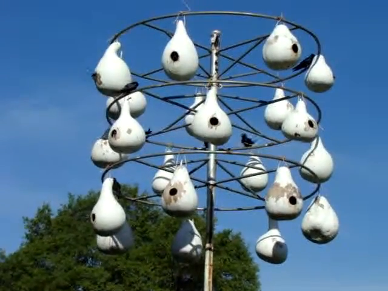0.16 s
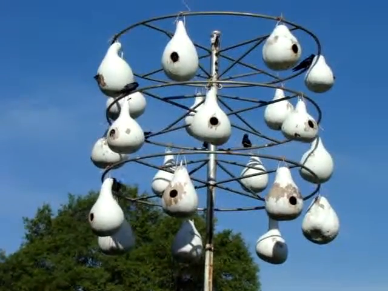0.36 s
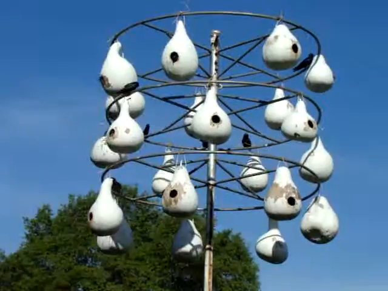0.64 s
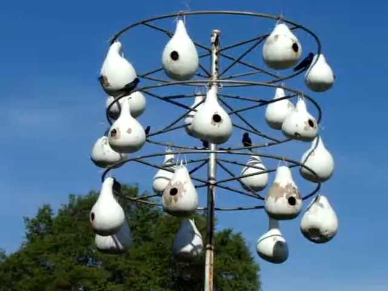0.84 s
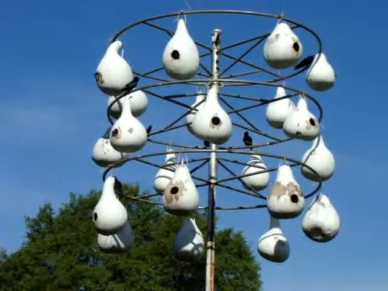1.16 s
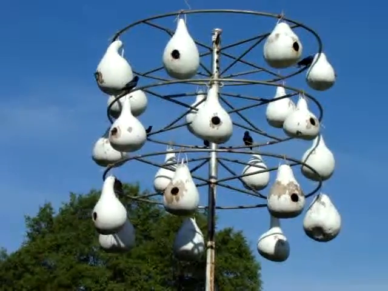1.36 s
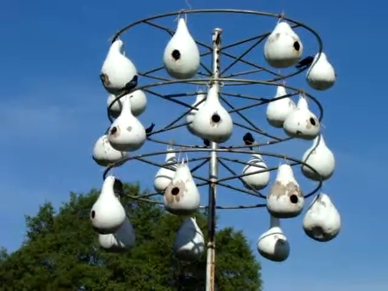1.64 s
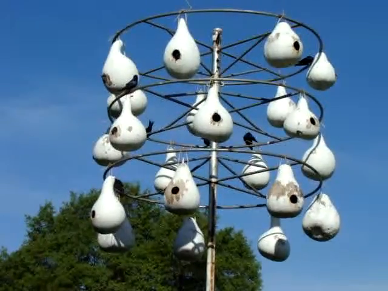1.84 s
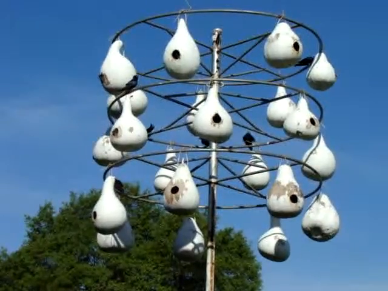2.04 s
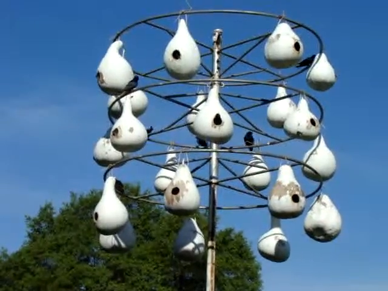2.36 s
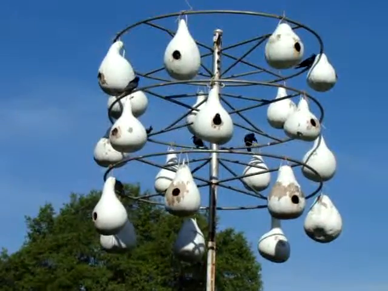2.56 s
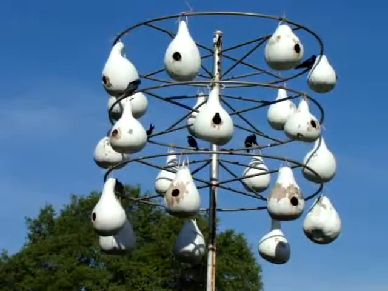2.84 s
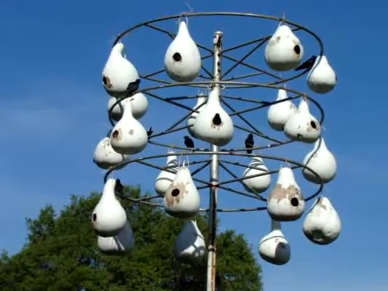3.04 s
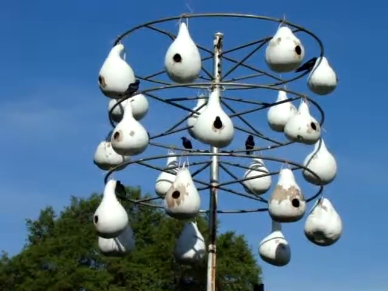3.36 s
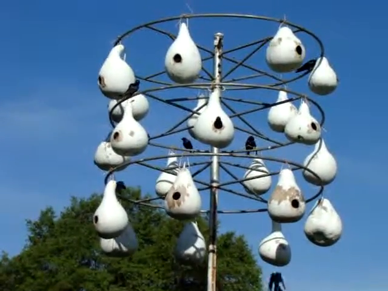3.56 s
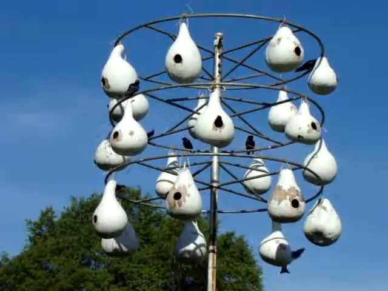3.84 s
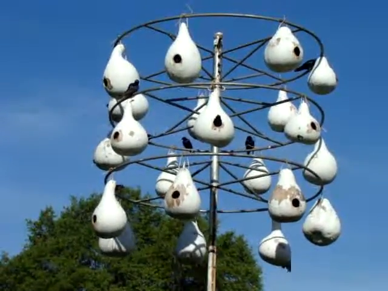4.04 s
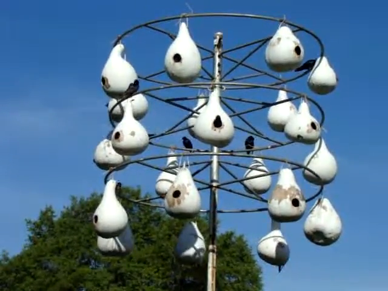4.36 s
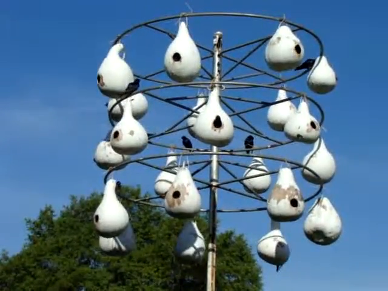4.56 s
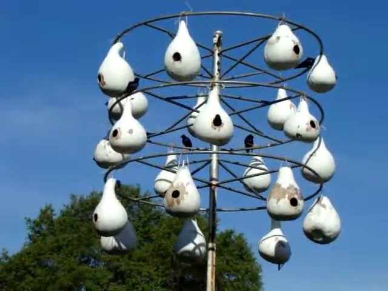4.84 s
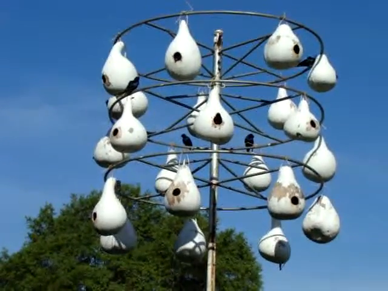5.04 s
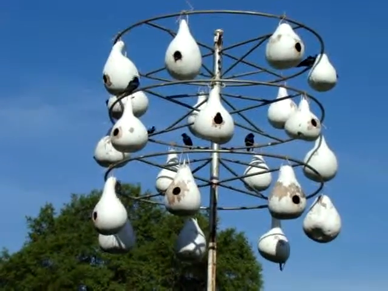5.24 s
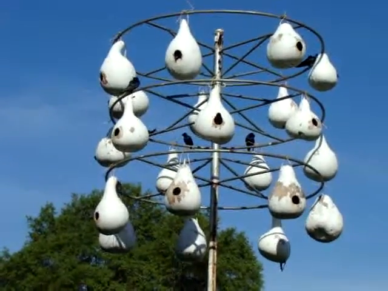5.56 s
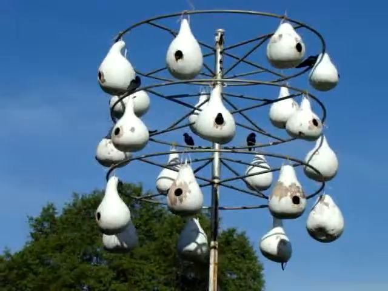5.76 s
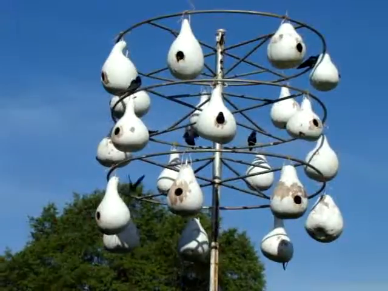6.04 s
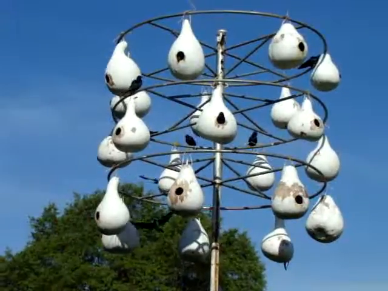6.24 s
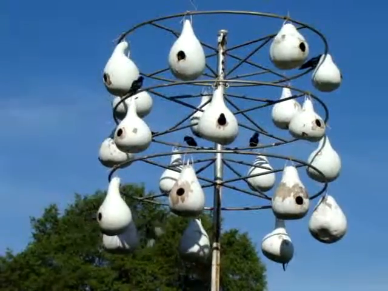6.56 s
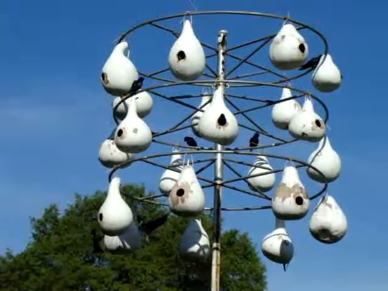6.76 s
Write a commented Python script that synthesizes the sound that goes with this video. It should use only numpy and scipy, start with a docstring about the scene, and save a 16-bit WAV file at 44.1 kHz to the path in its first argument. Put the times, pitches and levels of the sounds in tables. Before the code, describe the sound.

A colony of birds calls close to the microphone at an outdoor rack of hanging gourd nests. Quick falling chirps and harsh notes overlap with clucks, gliding whistles and high cheeps. A few faint bill snaps come in the first half, and short dry rattles join in the second. More birds call faintly further off, over a soft hush of open air and small bumps of breeze on the microphone.

```python
"""A colony of purple martins calls near the microphone, at a rack of hanging gourds on a calm, sunny day.
Each call is a gliding tone of the syrinx, roughened by flutter and shaped by throat and beak:
harsh chews, chirps, clucks, whistles, cheeps and dry rattles, with bill snaps and more birds further off.
Gourds, rack, ground and trees echo and scatter the calls.
Under them lies a soft outdoor hush; small puffs of breeze bump the microphone."""
import sys
import numpy as np
from scipy import signal
from scipy.fft import rfft, irfft, next_fast_len
from scipy.io import wavfile

SR = 44100
rng = np.random.default_rng(int(sys.argv[2]) if len(sys.argv) > 2 else 0)


def unload_wav(signal):
    """Save mono or channel-first audio to the path in sys.argv[1] as 16-bit WAV at rate SR, clipped to [-1, 1]."""
    wavfile.write(
        sys.argv[1],
        SR,
        np.round(np.clip(np.atleast_2d(signal).T, -1, 1) * 32767).astype(np.int16),
    )


N = 304290
TIME = np.arange(N) / SR


def undb(db):
    """Decibels to gain."""
    return 10 ** (np.asarray(db) / 20)


def colour(hz, points):
    """Gain of a spectrum of (f/Hz, level/dB) points at the given frequencies."""
    at, db = np.transpose(points)
    return undb(np.interp(np.log(hz + 1), np.log(at), db))


def unit(x):
    """Scale to rms 1."""
    return x / np.sqrt(np.mean(np.abs(x) ** 2))


def noise(size, low_hz, high_hz):
    """Noise between two soft edges, rms 1."""
    padded = next_fast_len(5120 * (size // 5120 + 1))
    hz = np.fft.rfftfreq(padded, 1 / SR) + 1
    detune = (hz ** 2 - low_hz * high_hz) / (hz * (high_hz - low_hz))
    spectrum = rng.standard_normal(2 * len(hz)).view(complex) / np.sqrt(1 + detune ** 4)
    return unit(irfft(spectrum, padded)[:size])


def walk(rate_hz):
    """Random wandering, spread near 1."""
    knots = rng.standard_normal(int(N / SR * rate_hz) + 2)
    return np.interp(TIME * rate_hz, np.arange(len(knots)), knots)


def add(track, s, sound):
    """Mix a sound into the track at time s."""
    start = int(np.clip(s * SR, 0, N))
    track[start:start + len(sound)] += sound[:N - start]


def slur(hz, octaves, bow):
    """Start, middle and end pitch of a fall from hz; bow (octaves) arches or sags its middle."""
    return hz * 2 ** np.array([0, bow - octaves / 2, -octaves])


def syrinx(length, pitches, db, swell, swell_width, overtones_db, rasp, harsh=.48, flare=0):
    """One note gliding through three pitches, roughened by a flutter as deep as its rasp."""
    # how throat and beak pass the overtones: f/Hz, level/dB
    beak = [(4000, -4), (5000, -15.5), (6500, -21.5), (9000, -21)]
    throat_hz, throat_width_hz = 3100, 130
    size = int(length * SR)
    progress = np.arange(size) / size
    glide = np.exp(np.polyval(np.polyfit([0, .5, 1], np.log(pitches), 2), progress))
    hz = glide * (1 + .12 * harsh ** 2 * noise(size, 30, 110))  # a harsh voice is unsteady
    phase = 2 * np.pi * np.cumsum(hz) / SR
    # the note flares as it sweeps through the throat resonance
    tone = np.exp(1j * phase) * flare / (1 + ((hz - throat_hz) / throat_width_hz) ** 2)
    for k in range(1, 5):
        gain = 1 if k == 1 else (k * hz < SR / 2) * undb(overtones_db + 3 * (4 - k)) * colour(k * hz, beak)
        # a harsh voice breaks into bursts; uneven cycles blur the higher overtones most
        bursts = np.maximum(1 + harsh * noise(size, 40, 170), 0) / np.hypot(1, harsh)
        blur = harsh * (k - .6) * noise(size, 80, 600)
        tone += gain * bursts * np.exp(1j * (k * phase + blur))
    flutter = unit(noise(size, 60, 600) + 1j * noise(size, 60, 600))
    voice = np.imag(tone * (1 + rasp * flutter)) / np.hypot(1, rasp)
    # swell places the push of breath along the note, 0-1
    pressure = np.sin(np.pi * progress ** .85) ** .5 / np.hypot(1, (progress - swell) / swell_width)
    return undb(db) * pressure * voice


def perch_echoes(sound, count=6, first_s=.004, spread_s=.04, echo_db=-11, fade_db=-12):
    """A call with its perch's own few echoes off the gourds, which beat with the sweep and break it up."""
    out = np.pad(sound, (0, SR // 10))
    for lag in (np.arange(count) + rng.random(count)) / count:
        add(out, first_s + spread_s * lag, sound * undb(echo_db + fade_db * lag))
    return out


def air(level_db=-46.5, drift_db=2.44):
    """Soft hush of the open air, drifting a little in level."""
    # spectrum of the hush: f/Hz, relative level/dB
    spectrum = [(20, -26), (80, 5), (190, -9), (580, -3), (1000, -6), (2200, -5), (4300, -12.5),
                (10000, -23.5)]
    hush = irfft(rfft(rng.standard_normal(N)) * colour(np.fft.rfftfreq(N, 1 / SR), spectrum), N)
    return unit(hush) * undb(level_db + drift_db * walk(1.6))


def wind(rumble_db=-2, gust_db=4, puff_db=-1):
    """Eddies right at the microphone: a weak uneven rumble and short bumps."""
    # breeze between the puffs: t/s, level/dB re rumble_db
    breeze = [(0, -48), (.7, -53.5), (.85, -44), (1.35, -52), (1.6, -63), (1.9, -46), (2.8, -52),
              (3.45, -55), (3.6, -46), (3.95, -45), (4.15, -58), (6.9, -57.5)]
    # puffs of air: t/s, length/s, level/dB re puff_db, f/Hz that sets the band
    puffs = [(0.067, 0.035, -35.5, 168), (0.208, 0.047, -36.5, 140), (0.284, 0.03, -36.5, 168),
             (0.415, 0.023, -30, 174), (0.428, 0.055, -26.5, 242), (2.219, 0.013, -31.5, 198.6),
             (2.272, 0.014, -31.5, 254), (2.552, .018, -32, 143), (2.701, 0.052, -34.5, 147),
             (2.958, 0.059, -28.5, 174), (3.248, 0.015, -24.5, 170), (3.774, 0.035, -36, 194),
             (3.982, .033, -33.5, 164), (5.154, 0.053, -37, 170), (6.102, 0.019, -38, 134),
             (6.321, 0.037, -36, 145)]
    breeze_db = np.interp(TIME, *np.transpose(breeze)) + rumble_db
    out = noise(N, 70, 210) * undb(breeze_db + gust_db * walk(25))
    for s, length, db, hz in puffs:
        size = int(length * SR)
        eddy = noise(SR // 4, hz * .59, hz * 1.2)[-size:] * np.sqrt(np.hanning(size))
        add(out, s, undb(db + puff_db) * unit(eddy))
    return out


def chews():
    """Harsh calls at the rack: an arched lead-in, a steep sweep that flares in the throat, a low tail."""
    # chews: t/s, sweep level/dB, throat flare/gain, overtones/dB, lead-in level/dB,
    # tail level/dB, tail length/s, tail start f/Hz
    calls = [(0.012, -21, 2.6, -2, -20.5, -26, 0.068, 2212), (.218, -21, 3.4, -3.5, -42, -20, 0.062, 2300),
             (0.56, -27, 1.5, -1, -44, -33, 0.031, 2410), (0.68, -21, 2.8, -6, -16.5, -25.5, 0.034, 2120),
             (1.522, -21, 1.6, -0.5, -20, -38, 0.075, 2300),
             (2.363, -17.5, 0.46, -8.5, -35, -19, 0.047, 2606),
             (2.884, -21.5, 2.1, -10.5, -41, -21.5, 0.06, 2560),
             (3.313, -22.5, 1.6, -2, -48, -22.5, 0.087, 2240),
             (3.775, -25.5, 2.1, 1.5, -23, -31.5, .07, 2334),
             (4.565, -26.5, 1.2, -5, -27.5, -36, 0.044, 2250),
             (6.185, -23, 0.95, 3.5, -22, -25, 0.076, 2372), (6.294, -23, 3.9, 0.5, -28, -27, 0.066, 2104),
             (6.821, -24, 2.6, -4, -18, -28, .05, 1885)]
    out = np.zeros(N)
    for s, db, flare, overtones_db, lead_db, tail_db, tail_s, tail_hz in calls:
        lead = syrinx(.02, slur(3100, octaves=.58, bow=.1363), lead_db, swell=.47, swell_width=.46,
                      overtones_db=overtones_db - 8, rasp=.31, harsh=.28)
        sweep = syrinx(.06, slur(4103, octaves=1.3, bow=-.09), db, swell=.11, swell_width=.65,
                       overtones_db=overtones_db, rasp=.31, harsh=.42, flare=flare)
        tail = syrinx(tail_s, slur(tail_hz, octaves=.6, bow=-.0385), tail_db, swell=.11, swell_width=.21,
                      overtones_db=overtones_db - 2, rasp=.2, harsh=.42)
        add(out, s - .021, perch_echoes(lead))
        add(out, s, perch_echoes(sweep))
        add(out, s + .053, perch_echoes(tail))
    return out


def chirps(gain_db=-1):
    """Down-slurs at the rack that start steep, swell once and flatten as they fade."""
    # chirps: t/s, length/s, start f/Hz, fall/octaves, level/dB re gain_db, place of the swell/0-1
    calls = [(0.089, 0.1, 3660, 1.02, -20.5, 0), (0.156, 0.11, 2980, 1.03, -27.5, 0.27),
             (0.364, 0.058, 3584, 1.54, -20.5, 0.29), (0.412, 0.059, 2900, 1, -23.5, 0.33),
             (0.46, 0.041, 2323, 0.8, -20, 0), (0.497, 0.046, 2850, 0.67, -23, 0.27),
             (0.518, 0.073, 3227, 1.39, -20, 0.13), (.83, 0.04, 2966, 0.77, -23, 0.28),
             (1.795, 0.06, 3900, 1.18, -17, 0), (1.937, 0.08, 3654, 0.92, -16.5, 0),
             (2.047, 0.044, 3780, 0.91, -16.5, 0.25), (2.075, 0.03, 2360, 0.49, -16.5, 0.12),
             (2.116, 0.046, 2587, 0.65, -16, 0), (2.764, 0.031, 3100, .8, -34, 0.45),
             (2.813, 0.049, 2520, 0.81, -37.5, 0.53), (3.195, 0.063, 4640, 1.08, -31.5, 0.67),
             (3.401, 0.089, 2886, .9, -23, 0), (4.051, 0.12, 3910, 1.38, -27.5, 0.22),
             (4.25, 0.073, 3820, 1.66, -26, 0.32), (4.602, 0.051, 3930, 0.6, -26.5, 0.27),
             (4.69, 0.026, 2370, 0.54, -27, 0.2), (4.712, 0.074, 3156, 1.1, -18.5, 0),
             (4.88, .05, 2537, 0.56, -25, 0.3), (4.922, 0.049, 2444, .9, -27, 0.02),
             (5.07, 0.07, 3620, 1.38, -28, 0), (5.125, 0.078, 3234, 1.02, -22.5, 0.22),
             (5.265, 0.095, 3940, 0.77, -23.5, 0.05), (5.331, 0.11, 3566, 1.1, -23, 0.42),
             (5.58, 0.04, 3470, 0.57, -25.5, 0.32), (5.779, 0.023, 2370, 0.48, -23, 0.1),
             (5.798, .058, 3200, 1.25, -13.5, 0), (6.443, 0.067, 4400, 1.04, -21.5, 0.3),
             (6.544, 0.047, 2773, 0.66, -20.5, 0.37), (6.6, 0.045, 2250, 0.75, -20, 0),
             (6.634, 0.071, 4000, .9, -15, 0.02)]
    out = np.zeros(N)
    for s, length, hz, octaves, db, swell in calls:
        chirp = syrinx(length, slur(hz, octaves, bow=-.0703), db + gain_db, swell, swell_width=.21,
                       overtones_db=-16.5, rasp=.28, harsh=.28)
        add(out, s, perch_echoes(chirp))
    return out


def far_birds(count=45, chirp_db=-50, whistle_db=-49):
    """The rest of the colony chirps and whistles at random, far from the microphone."""
    out = np.zeros(N)
    for chirp_at, slow, high, whistle_at in rng.random((count, 4)):
        fall = np.array([3300, 2200, 1500]) * (.8 + .5 * high)
        chirp = syrinx(.04 + .06 * slow, fall, chirp_db,
                       swell=.4, swell_width=.3, overtones_db=-12, rasp=.1)
        add(out, chirp_at * N / SR, chirp)
        glide = 1200 * 6 ** high * np.array([.9 + .15 * slow, 1, 1.02])
        whistle = syrinx(.04 + .08 * slow, glide, whistle_db - 5 * high,
                         swell=.5, swell_width=.4, overtones_db=-30, rasp=0)
        add(out, whistle_at * N / SR, whistle)
    return out


def clucks(gain_db=-1):
    """Brief notes at the rack, clear or grating, that droop only a little."""
    # clucks: t/s, length/s, start f/Hz, level/dB re gain_db, rasp/0-1
    calls = [(0.589, 0.035, 2880, -25, 0.9), (0.721, 0.041, 3100, -22.5, 0.2),
             (0.771, 0.052, 2734, -24, .6), (.815, 0.041, 2750, -25, 0.3), (0.866, 0.041, 2900, -28, 1),
             (1.473, 0.015, 3450, -18, 0.2), (1.513, 0.038, 2250, -21, 0.02),
             (1.962, 0.028, 3176, -11.5, 0.22), (1.997, 0.03, 2700, -22, 1), (2.028, .035, 2450, -16, 0.1),
             (5.626, 0.03, 2733, -18.5, .2), (5.664, 0.0259, 2600, -20, 0.43), (5.836, .07, 3150, -26, 1),
             (6.272, 0.026, 2317, -21.5, 0.5), (6.674, 0.047, 2750, -18, 1),
             (6.714, 0.035, 2660, -17, 0.43), (6.75, 0.034, 2442, -18.5, 0.27)]
    out = np.zeros(N)
    for s, length, hz, db, rasp in calls:
        cluck = syrinx(length, slur(hz, octaves=.204, bow=.014), db + gain_db, swell=.37, swell_width=.63,
                       overtones_db=-18, rasp=rasp, harsh=.28)
        add(out, s, perch_echoes(cluck))
    return out


def whistles(gain_db=-.5, full_rasp_hz=8450):
    """Slow even glides, mostly at the rack, a few faint ones further off; the low ones are pure, the high ones
    waver."""
    # whistles: t/s, length/s, start f/Hz, end f/Hz, level/dB re gain_db
    calls = [(0.933, .06, 3700, 4700, -39.5), (0.988, .055, 3460, 2780, -22),
             (1.064, 0.11, 2830, 2458, -21), (1.167, 0.086, 2670, 2540, -36),
             (1.246, 0.038, 1133, 1266, -39), (1.266, 0.13, 3217, 3150, -33),
             (1.329, 0.049, 2160, 2090, -31), (1.425, 0.029, 3230, 3160, -39),
             (1.679, 0.15, 5130, 4250, -36), (2.06, 0.072, 4100, 5300, -48),
             (2.191, 0.057, 1513, 1650, -34), (2.315, 0.075, 1476, 1612, -32.5),
             (2.491, 0.034, 1178, 1266, -35.5), (3.111, 0.05, 1896, 2175, -20),
             (4.3, 0.073, 4700, 5300, -46), (4.358, 0.047, 3850, 4690, -42),
             (4.395, 0.16, 4800, 4480, -45.5), (5.001, 0.126, 4070, 3900, -35.5),
             (5.379, .13, 5900, 6470, -37.5), (5.499, .05, 4920, 4550, -30), (5.565, .11, 5025, 4985, -27),
             (5.689, 0.049, 4320, 4195, -31.5), (5.745, .05, 5110, 4510, -27),
             (5.907, .09, 2800, 2470, -14.5), (6, 0.05, 4910, 5104, -37)]
    out = np.zeros(N)
    for s, length, start_hz, end_hz, db in calls:
        middle_hz = np.sqrt(start_hz * end_hz)
        whistle = syrinx(length, [start_hz, middle_hz, end_hz], db + gain_db, swell=.69, swell_width=.43,
                         overtones_db=-24.5, rasp=(middle_hz / full_rasp_hz) ** 2, harsh=.16)
        add(out, s, perch_echoes(whistle))
    return out


def bill_snaps(decay_s=.016, gain_db=-9, crack_db=-10):
    """A bill snaps shut: a short dry ring with a brighter crack."""
    # snaps: t/s, level/dB re gain_db, ring f/Hz
    snaps = [(1.3887, -27.5, 2100), (2.6697, -27.5, 1770), (2.704, -24.5, 2550), (2.788, -20, 2100),
             (2.988, -24.5, 3300), (3.0777, -25.5, 1720)]
    out, t = np.zeros(N), TIME[:SR // 20]
    for s, db, hz in snaps:
        ring = noise(len(t), hz * .93, hz * 1.35)
        crack = undb(crack_db) * noise(len(t), 1800, 7000)
        add(out, s, undb(db + gain_db) * (ring + crack) * np.exp(-t / decay_s))
    return out


def cheeps(upper_ratio=1.16, upper_db=-10.5):
    """Both sides of the syrinx hold a high note, one above the other, then drop."""
    # cheeps, lower voice: t/s, length/s, start f/Hz, level/dB, place of the swell/0-1
    calls = [(1.82, 0.068, 5180, -23.5, 0.55), (2.356, 0.055, 4900, -20, 0.5),
             (3.205, 0.042, 6560, -33.5, 0.76), (3.491, .047, 4610, -16.5, 0.22),
             (4.903, .058, 4794, -16.5, 0.37), (5.147, 0.067, 4744, -19.5, 0.44)]
    out = np.zeros(N)
    for s, length, hz, db, swell in calls:
        arch = slur(hz, octaves=.55, bow=.18)
        for ratio, voice_db in [(1, 0), (upper_ratio, upper_db)]:
            voice = syrinx(length, arch * ratio, db + voice_db, swell, swell_width=.25,
                           overtones_db=-13, rasp=.41, harsh=.28)
            add(out, s, voice)
    return out


def twitter(db=-55):
    """A small bird in the distance twitters in thin rising notes."""
    out = np.zeros(N)
    for s in np.arange(2.42, 2.78, .075):
        rise = np.array([5600, 6500, 7400]) * rng.uniform(.95, 1.15)
        add(out, s, syrinx(.04, rise, db, swell=.5, swell_width=.5, overtones_db=-40, rasp=0, harsh=.1))
    return out


def rattles(duty=.85):
    """Quick runs of tiny steep down-sweeps at the rack, each a little different."""
    # runs: t/s, length/s, syllable spacing/s, nominal top f/Hz, nominal bottom f/Hz, mean level/dB
    runs = [(3.563, .11, 0.028, 2620, 1575, -30), (3.941, .11, 0.024, 3666, 1335, -27.5),
            (4.236, .11, 0.029, 2815, 1465, -26.5), (5.253, .115, 0.032, 2986, 1406, -28.5),
            (6.031, .11, .024, 3260, 1202, -29.5), (6.483, .29, 0.023, 3590, 1229, -26.5)]
    out = np.zeros(N)
    for s, length, spacing, top_hz, bottom_hz, db in runs:
        fall = np.array([top_hz, .45 * top_hz + .5 * bottom_hz, bottom_hz])
        for lag in np.arange(0, length, spacing):
            late, high, loud = rng.standard_normal(3)
            syllable = syrinx(duty * spacing, fall * (.95 + .06 * high), db + 1.2 * loud,
                              swell=.19, swell_width=1, overtones_db=-17, rasp=.26)
            add(out, s + lag + .002 * late, perch_echoes(syllable, count=8))
    return out


def surroundings(birds, near_db=-20, near_t60=.34, trees_db=-24, trees_t60=1.0):
    """Dense early scatter from rack and ground, then a faint, duller wash from the trees."""
    t = TIME[:SR]
    near = noise(SR, 1000, 10000) * undb(-60 * t / near_t60) * (t > .004)
    trees = noise(SR, 1000, 4500) * undb(-60 * t / trees_t60) * (1 - np.exp(-t / .02))
    response = (undb(near_db) * unit(near) + undb(trees_db) * unit(trees)) / np.sqrt(SR)
    return signal.fftconvolve(birds, response)[:N]


def scene():
    """The birds, their echoes, the breeze and the open air at one microphone."""
    outdoors = wind() + air()
    birds = chews() + chirps() + clucks() + cheeps() + whistles() + bill_snaps()
    birds += far_birds() + twitter() + rattles()
    return (birds + surroundings(birds) + outdoors)[None]


def record(dry, top_hz=10100):
    """The camera cuts the top treble steeply."""
    return signal.sosfilt(signal.ellip(10, .2, 80, top_hz, fs=SR, output="sos"), dry)


dry = scene()
out = record(dry)
unload_wav(out)
```